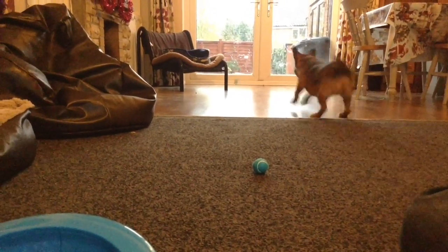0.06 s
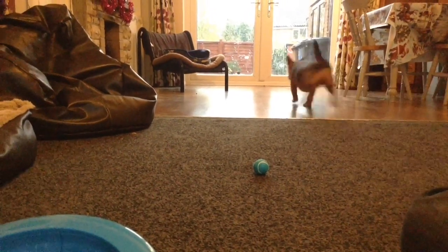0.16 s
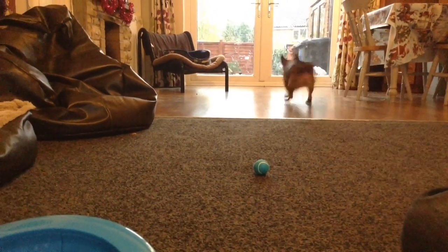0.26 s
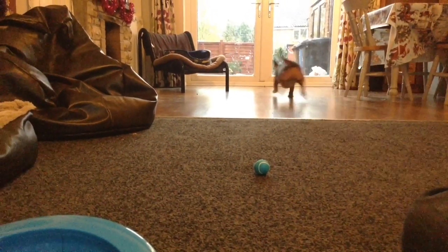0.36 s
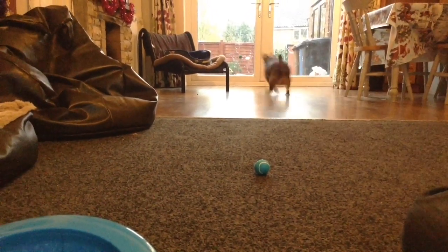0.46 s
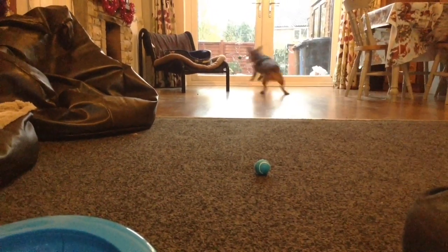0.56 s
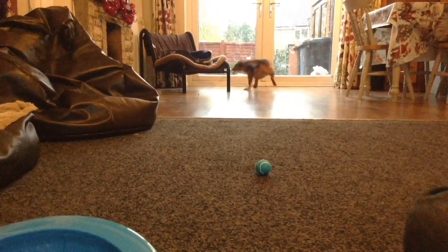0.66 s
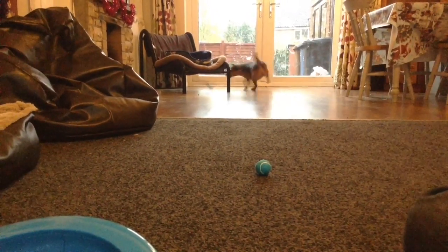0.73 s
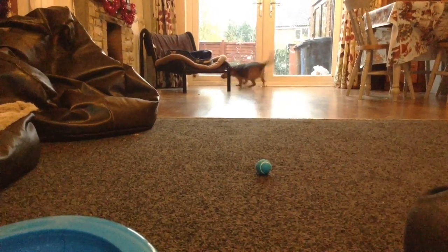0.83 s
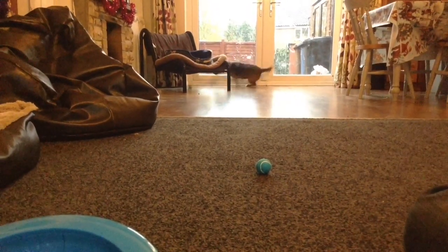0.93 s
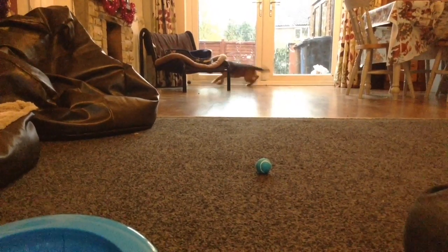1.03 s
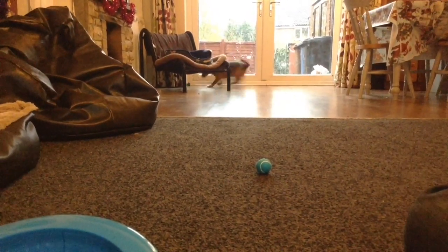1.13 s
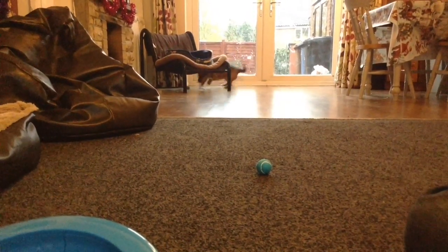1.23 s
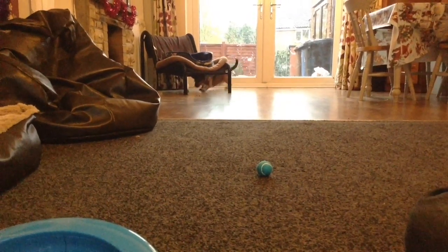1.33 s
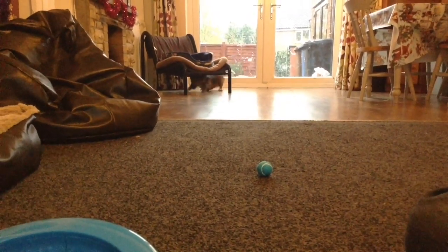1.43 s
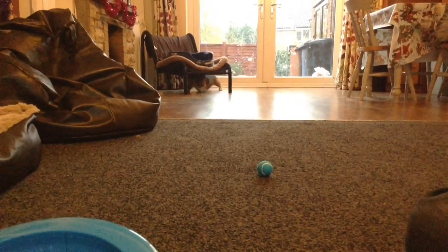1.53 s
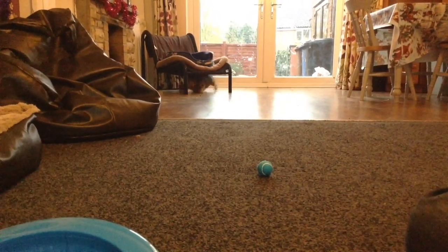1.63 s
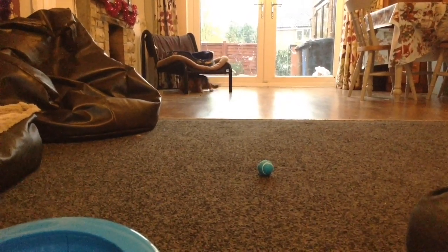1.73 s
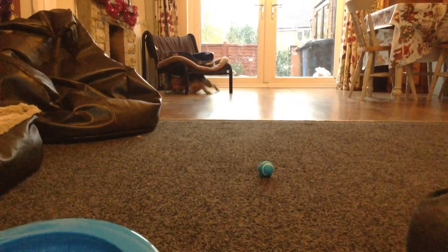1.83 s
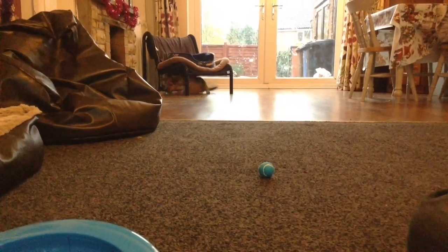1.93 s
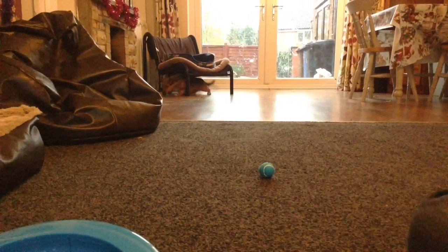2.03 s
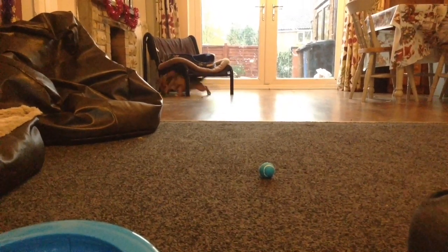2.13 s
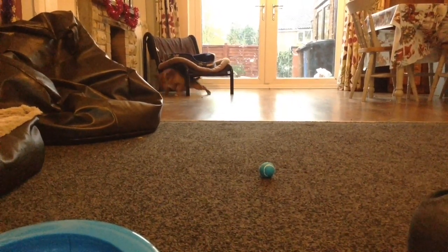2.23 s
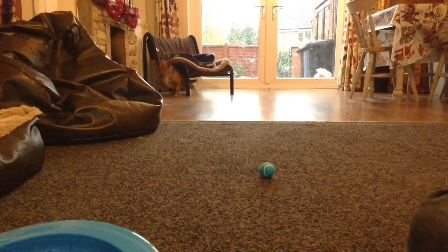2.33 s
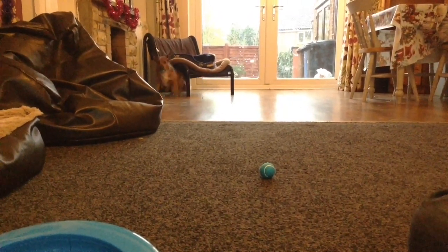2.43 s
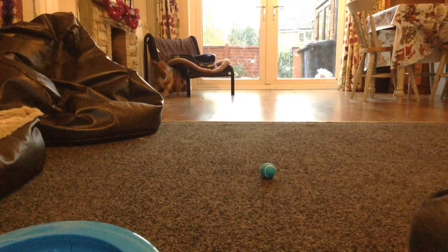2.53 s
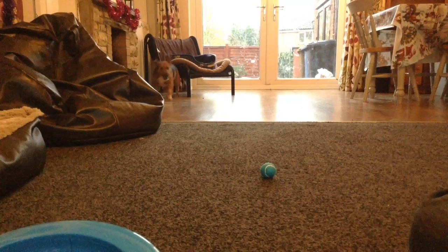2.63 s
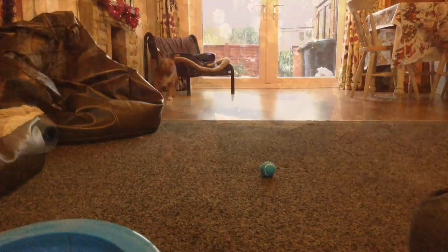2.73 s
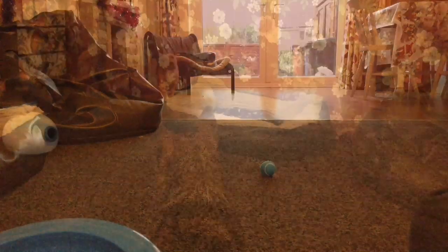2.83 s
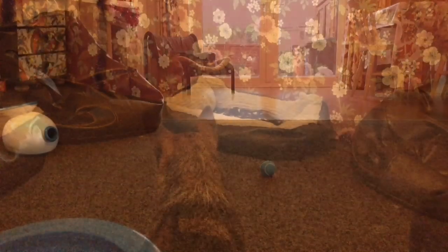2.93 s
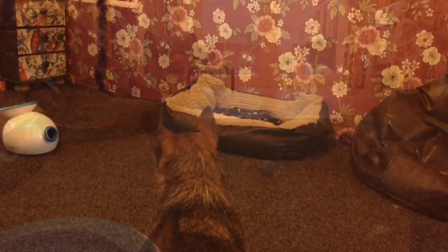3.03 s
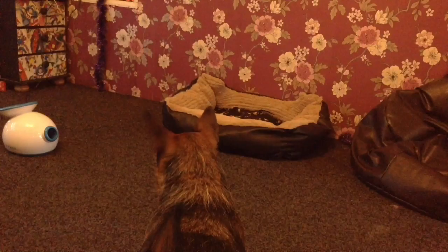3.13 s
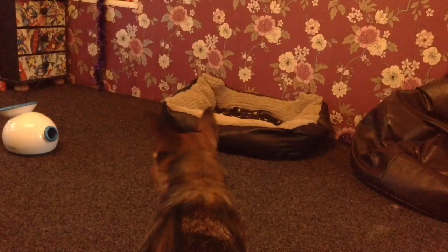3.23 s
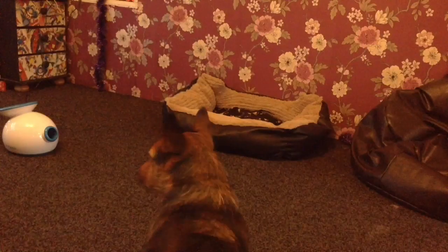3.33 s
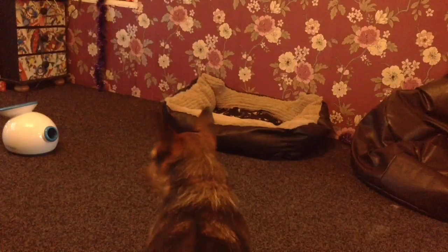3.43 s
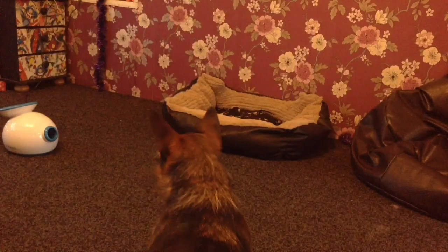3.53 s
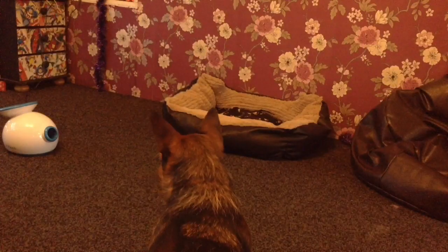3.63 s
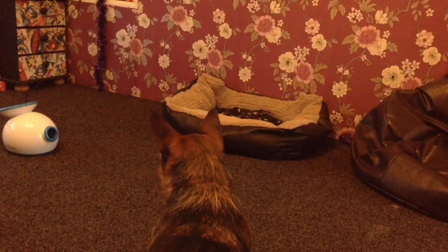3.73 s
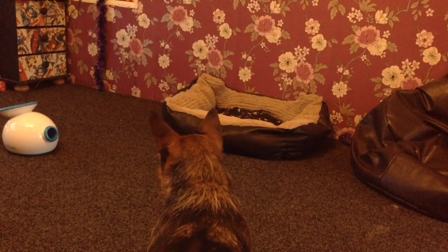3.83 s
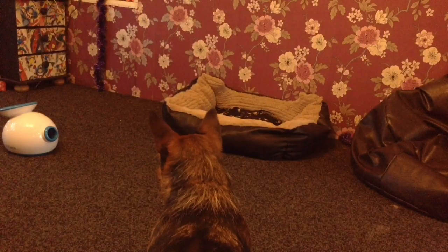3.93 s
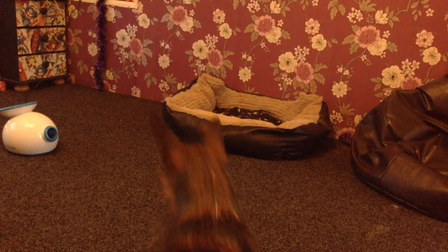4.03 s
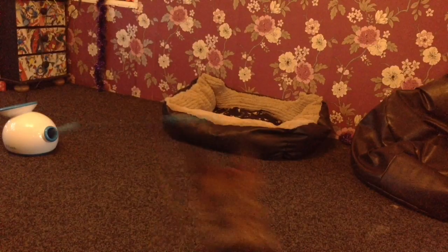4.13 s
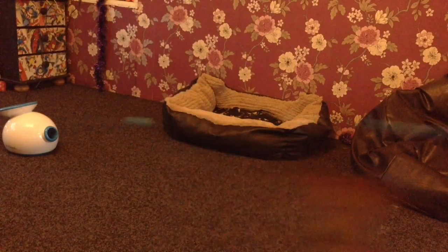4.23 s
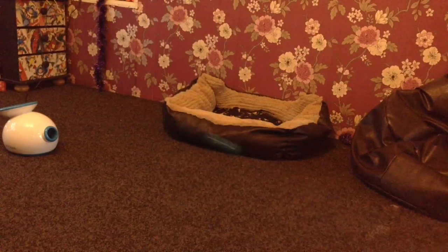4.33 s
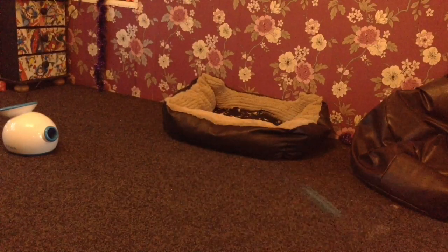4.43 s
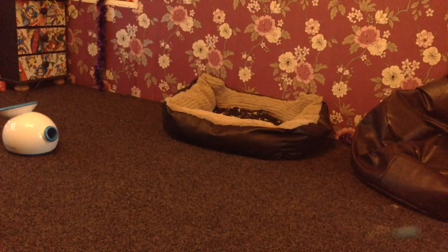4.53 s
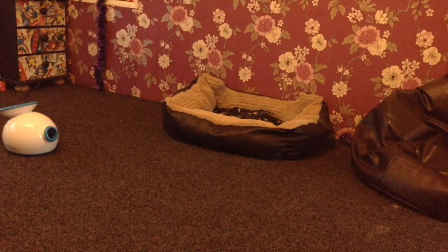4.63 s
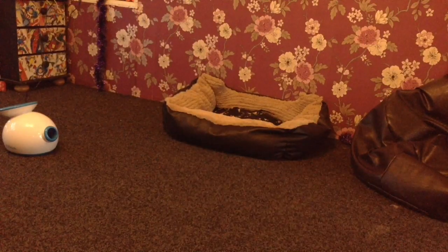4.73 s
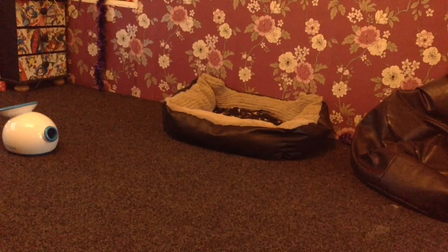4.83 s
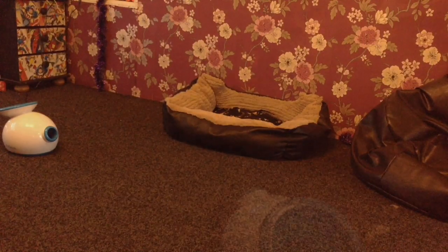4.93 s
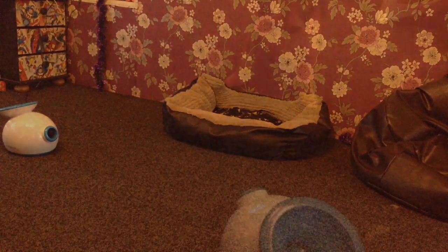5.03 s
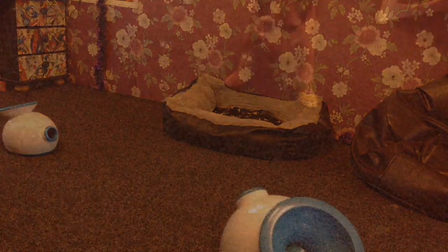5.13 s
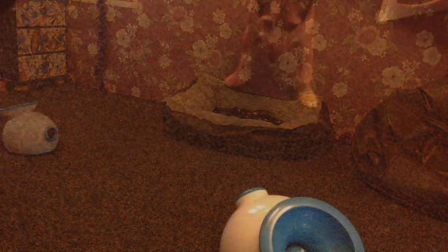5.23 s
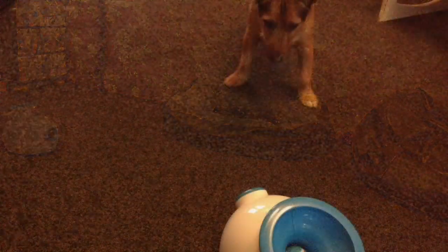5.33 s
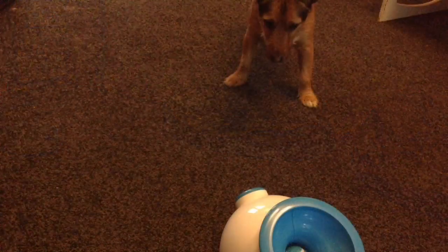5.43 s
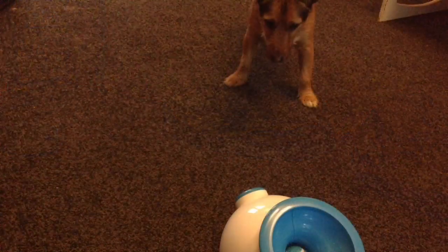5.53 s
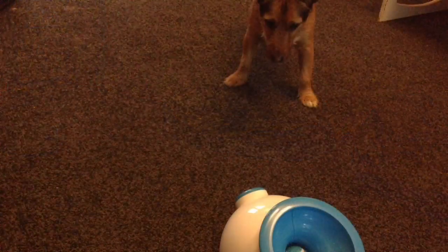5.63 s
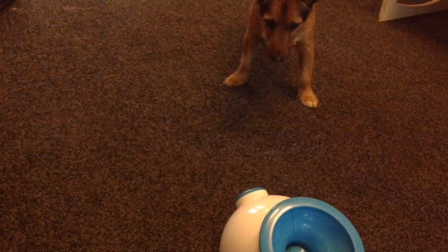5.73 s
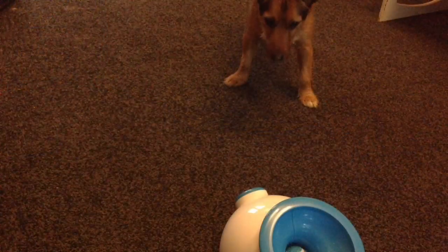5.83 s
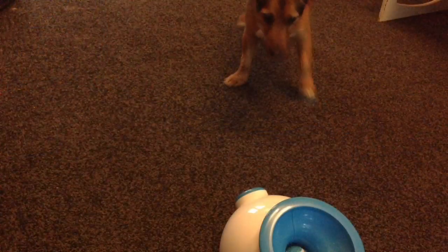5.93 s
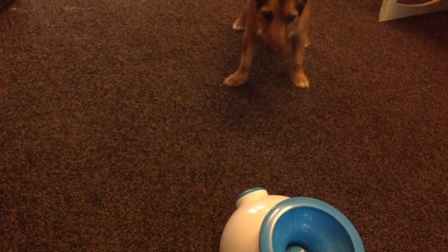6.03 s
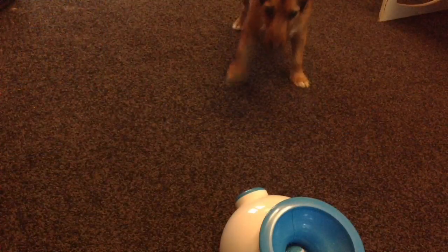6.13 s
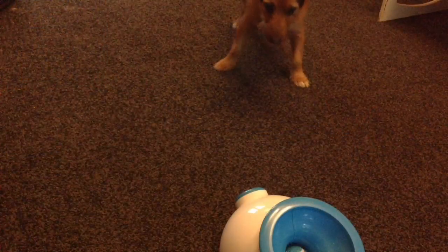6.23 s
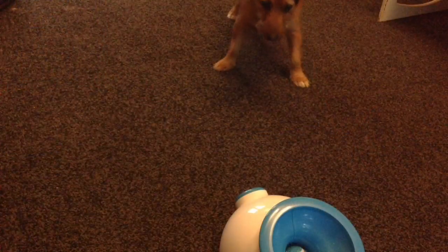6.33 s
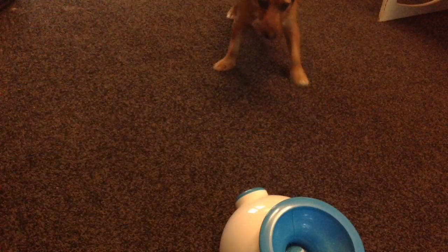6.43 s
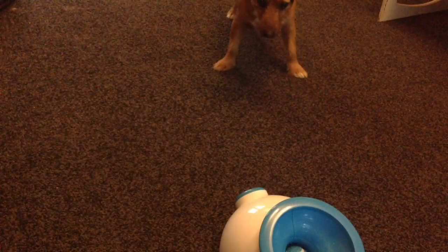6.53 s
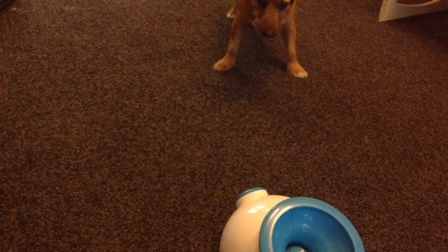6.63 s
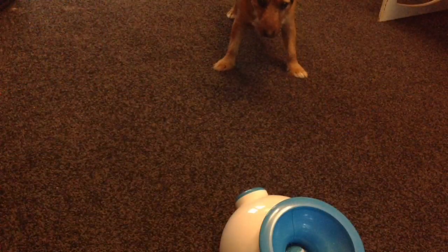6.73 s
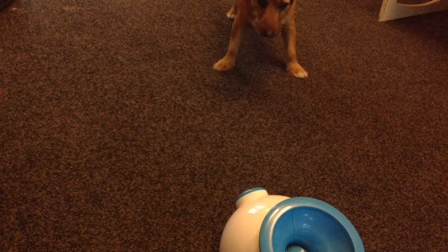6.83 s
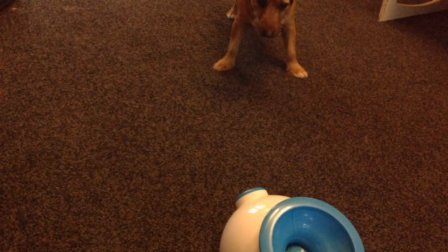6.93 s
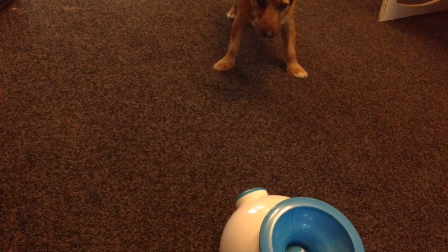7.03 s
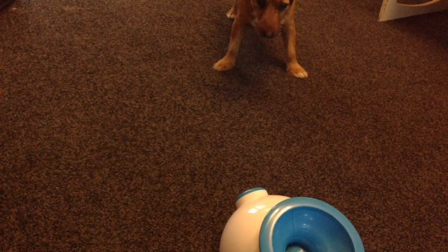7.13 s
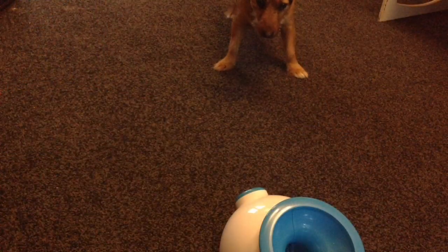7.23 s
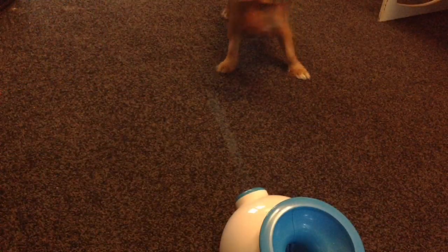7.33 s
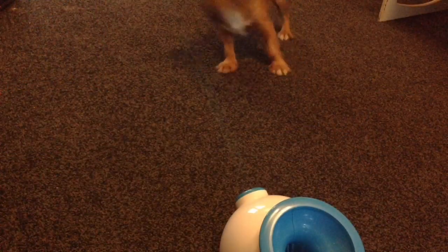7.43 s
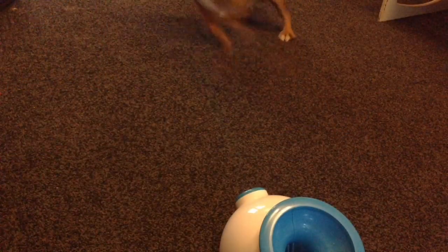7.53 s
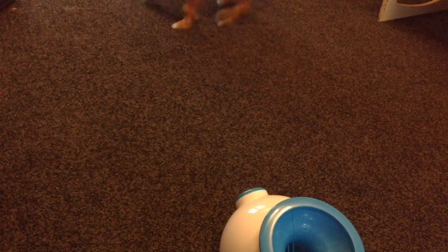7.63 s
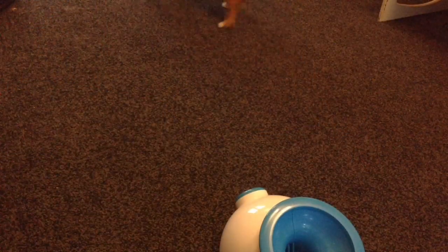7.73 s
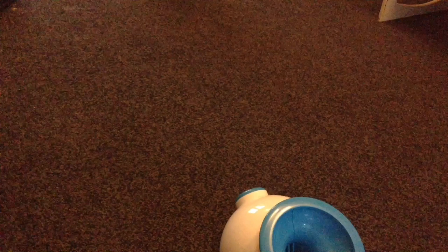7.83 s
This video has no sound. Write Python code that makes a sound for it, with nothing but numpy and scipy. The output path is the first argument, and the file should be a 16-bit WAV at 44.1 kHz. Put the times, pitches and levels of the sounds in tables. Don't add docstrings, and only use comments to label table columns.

```python
import sys
import numpy as np
from scipy import signal
from scipy.fft import rfft, irfft, next_fast_len
from scipy.io import wavfile
from scipy.ndimage import uniform_filter1d

SR = 44100
rng = np.random.default_rng(int(sys.argv[2]) if len(sys.argv) > 2 else 0)


def voltage_ratio(level):
    return 10 ** (np.asarray(level, float) / 20)


def generate_wav(signal):
    frames = np.transpose(np.atleast_2d(signal))
    scaled = np.clip(frames, -1, 1) * 32767
    pcm = np.round(scaled).astype(np.int16)
    wavfile.write(sys.argv[1], SR, pcm)


N = 347067


def rms_one(x):
    return x / np.sqrt(np.mean(x ** 2) + 1e-20)


def peak_level_db(x):
    return 20 * np.log10(np.abs(x).max())


def in_time(rows):
    s, *columns = np.transpose(rows)
    return [np.interp(np.arange(N) / SR, s, c) for c in columns]


def at_hz(points, hz):
    points = np.array(points)
    return np.interp(np.log(hz), np.log(points[:, 0]), points[:, 1])


def colour(x, points, tilt_db=0, pivot_hz=4000):
    size = next_fast_len(len(x) + 4096)
    hz = np.maximum(np.fft.rfftfreq(size, 1 / SR), 20)
    level_db = at_hz(points, hz) + tilt_db * np.log2(hz / pivot_hz)
    cepstrum = irfft(np.log(voltage_ratio(level_db)), size)
    cepstrum[1:(size + 1) // 2] *= 2
    cepstrum[size // 2 + 1:] = 0
    return irfft(rfft(x, size) * np.exp(rfft(cepstrum)), size)[:len(x)]


def rippled(x, ripple):
    size = next_fast_len(len(x))
    hz = np.fft.rfftfreq(size, 1 / SR)
    ripple_db = sum(depth_db * np.exp(-((hz - at) / width) ** 2) for at, width, depth_db in ripple)
    return irfft(rfft(x, size) * voltage_ratio(ripple_db), size)[:len(x)]


def ring(x, hz, t60):
    r, w = voltage_ratio(-60 / (t60 * SR)), 2 * np.pi * hz / SR
    return signal.lfilter([0, np.sin(w)], [1, -2 * r * np.cos(w), r * r], x + 1e-18)


def envelope(rise, t60, start, size=22050):
    t = np.arange(size) / SR
    rise, t60 = max(rise, .0005), max(t60, .005)
    return np.where(t < rise, start + (1 - start) * t / rise, voltage_ratio(-60 * (t - rise) / t60))


def add(bus, s, sound, peak_db):
    i = max(round(s * SR), 0)
    bus[i:i + len(sound)] += (voltage_ratio(peak_db) * sound / np.abs(sound).max())[:N - i]


def grains(size, spread_db):
    return rng.standard_normal(size) * voltage_ratio(spread_db * np.minimum(rng.exponential(1, size), 4))


def wander(rate_hz, points, swing_db):
    return voltage_ratio(np.interp(np.arange(N) / SR * rate_hz, np.arange(points), rng.normal(0, swing_db, points)))


# start_s, end_s
BLENDS = [
    (2.7, 3.31),
    (4.9, 5.52),
]


def listening_place():
    return in_time([(s, k + j) for k, blend in enumerate(BLENDS) for j, s in enumerate(blend)])[0]


def drag_strokes(size, step, swing_db):
    clumps = np.interp(np.arange(size) / step, np.arange(150), voltage_ratio(rng.normal(0, swing_db, 150)))
    return grains(size, spread_db=3.0) * clumps


# start_s, peak_db,
# fade_t60_s, tilt_db_per_octave
BOARD_SCUFFS = [(0.0, -8, 0.29, 2.5), (0.11, -8.5, 0.47, 4), (0.1865, -14, 0.53, 4),
                (0.3558, -14, 0.36, -8), (0.414, -10, 1, 1.5), (0.5292, -8, 0.42, 2.5),
                (0.56, -14, 0.83, -2.5), (0.7284, -11, 0.2, 5), (0.7543, -12, 1, 1),
                (0.8674, -9.5, 0.26, 7), (0.8869, -8.5, 1, -2.5), (0.92, -12, 0.69, 9),
                (1.1007, -26, 0.58, 9), (1.247, -17, 0.85, -0.5), (1.316, -22.5, 0.25, 4),
                (1.3875, -21.5, 0.33, -6), (1.4651, -7, 0.62, -0.5), (1.706, -6.5, 0.42, 2),
                (1.8406, -7.5, 0.91, 0), (2.0573, -13, 0.43, 2), (2.256, -19, 0.32, -1),
                (2.285, -22.5, 0.72, -1.5), (2.4838, -18.5, 0.43, -13), (2.691, -30.5, 0.38, 2),
                (2.885, -38, 0.1, 3)]
CARPET_SCUFFS = [(4.0876, -22, 0.23, 3), (4.41, -30, 1, 6.5), (4.503, -11, 0.3, -7.5),
                 (4.6346, -14, 0.38, 3.5), (4.682, -12, 0.35, 3), (4.803, -14, 0.37, 5.5),
                 (4.9055, -14.5, 0.16, 1), (4.925, -19, 0.55, 4.5), (5.0553, -14.5, 0.64, 4),
                 (4.984, -21.5, .3, -7), (5.108, -13.5, 0.61, 0.5), (5.125, -14.5, 0.44, 2.5),
                 (5.24, -19, 0.96, 2), (6.4495, -68, 0.25, 9)]
# pitch_hz, level_db_per_hz
SCUFF_COLOUR = [(710, -63), (1200, -6), (1520, -6.5), (1830, -0.5), (2250, -5), (2590, -1), (3700, 6),
                (11700, -5), (15300, -9.5), (16000, -67)]


def scuffs(near, far):
    floors = ((BOARD_SCUFFS, .02, .4, -17), (CARPET_SCUFFS, .0069, .9, -14))
    for rows, swell_s, bite, room_db in floors:
        for s, peak_db, t60, tilt_db in rows:
            shape = envelope(swell_s, t60, start=bite)
            drag = shape * drag_strokes(len(shape), 150, 1.5)
            patches = 0
            for step, hz in zip((500, 700, 900), 3600 * 2 ** rng.uniform(0, 1, 3)):
                claw = shape * drag_strokes(len(shape), step, 6)
                patches = patches + ring(claw, hz, 16 / hz)
            sound = rms_one(drag) + voltage_ratio(-10.5) * rms_one(patches)
            sound = colour(sound, SCUFF_COLOUR, tilt_db)
            add(near, s, sound, peak_db - 3.0)
            add(far, s, sound, peak_db + room_db)


# start_s, peak_db
TICKS = [(0.1093, -10), (0.4143, -7), (0.4744, -12), (0.556, -7.5), (0.7287, -16), (0.7547, -2),
         (0.8694, -20), (0.901, -3), (1.1008, -11), (1.2462, -13.5), (1.3163, -14), (1.3394, -14),
         (1.4679, 1.5), (1.4894, -59.5), (1.8423, -11), (2.0596, -15), (3.379, -30), (4.141, -18),
         (4.6353, -8), (4.684, -8), (4.7865, -3.5), (4.8055, -9), (4.9045, -17), (5.0564, -23),
         (5.238, -20), (7.1817, -2), (7.7026, -20), (7.798, 0.5), (7.7695, 6), (4.09, -19), (7.3105, -19),
         (7.3595, -24.5), (7.4915, -28), (4.341, -28), (4.371, -27), (4.9245, -24)]
# pitch_hz, level_db_per_hz
SNAP_COLOUR = [(1500, -19.5), (3500, -5.5), (5500, 0.5), (8300, -9), (11500, -1.5), (16000, -6.5)]


def ticks(near, far):
    for s, peak_db in TICKS:
        snap = rng.standard_normal(1024) * envelope(0, .006, start=1, size=1024)
        snap = colour(snap, SNAP_COLOUR)
        add(near, s, snap, peak_db - 4.5)
        add(far, s, snap, peak_db - 16)


# start_s, peak_db, boom_hz, t60_s
THUDS = [(0.079, -15, 315, 0.13), (0.117, -13.5, 217, 0.11), (0.333, -17, 256, 0.66), (0.38, -9, 227, 0.16),
         (0.407, -19.5, 235, 0.13), (0.434, -10, 235, 0.34), (0.528, -13, 349, 0.42),
         (0.748, -16, 290, 0.32), (0.787, -9.5, 260, 0.19), (1.016, -12, 245, 0.19),
         (1.264, -19.5, 267, 0.93), (1.47, -9, 190, 0.2), (1.478, -6.5, 292, 0.25), (1.527, -13, 197, 0.14),
         (1.706, -17, 286, 0.48), (1.777, -17.5, 266, 0.057), (1.847, -21, 300, 0.11),
         (1.979, -7, 300, 0.1), (1.989, -5, 298, 0.18), (2.488, -17.5, 294, 0.1), (2.523, -21, 250, 0.36),
         (4.093, -19, 230, 0.11), (4.147, -22, 240, 0.16), (4.19, -24, 250, 0.052),
         (4.222, -24.5, 237, 0.086), (4.639, -10.5, 322, 0.054), (4.699, -19.5, 283, 0.07),
         (4.782, -27.5, 255, 0.11), (4.987, -19, 313, 0.62), (5.124, -22.5, 336, 0.2),
         (5.23, -14, 320, 0.066), (7.186, -17, 382, 0.14), (7.364, -11, 282, 0.018), (7.695, -24, 374, 0.1),
         (3.945, -23, 372, 0.1)]


def thuds(near, far):
    press_s, puff_tilt_db, size = .011, -11.5, 13230
    ratios = [.7, .85, 1.0, 1.2, 1.5, 1.9]
    usual_db = np.array([7.9, 19.0, 39.7, 16.3, 6.8, 3.1])
    for s, peak_db, hz, t60 in THUDS:
        push = envelope(press_s, max(t60, .02), start=0.8, size=size) * rng.standard_normal(size)
        push[:2] += 12
        strength = voltage_ratio(usual_db + rng.normal(0, 10.0, 6))
        boom = sum(g * ring(push, hz * k, .055) for k, g in zip(ratios, strength))
        puff = colour(push, [(100, -20.0), (300, -34.0), (16000, -4)], puff_tilt_db, pivot_hz=300)
        sound = rms_one(boom) + voltage_ratio(4.5) * rms_one(puff)
        add(near, s - .002, sound, peak_db)
        add(far, s - .002, sound, peak_db - 4.5)


# pitch_hz, level_db_per_hz
SHELL_COLOUR = [(59, 16), (100, -86), (343, 2), (608, -24.5), (854, 2), (1910, 1), (2320, -1.5),
                (4870, -10), (9210, -15.5), (14700, -22), (16000, -28)]
# pitch_hz, level_db, t60 in steps of 0.025 s
SHELL = [(372, 4, 1.4), (870, 19, 4.4), (2380, 12.5, 2.1), (1350, 5, 2.7), (4800, 3, .8)]


def struck_shell(shake, grip, crack_t60, body_hz, tilt_db, beside):
    size = len(shake) - grip
    crack = rng.standard_normal(size) * voltage_ratio(-60 * np.arange(size) / SR / crack_t60)
    blow = shake.copy()
    blow[grip:] += crack * 7 / np.sqrt(np.sum(crack ** 2))
    modes = 0
    for hz, mode_db, t60 in SHELL:
        strength = voltage_ratio(mode_db + rng.normal(0, 4))
        modes = modes + strength * ring(blow, hz * rng.uniform(.985, 1.015), .025 * t60)
    body = ring(blow, body_hz, .012)
    modes_db, body_db = (-19.5, -10.5) if beside else (-9.5, -3.5)
    ringing = voltage_ratio(modes_db) * rms_one(modes) + voltage_ratio(body_db) * rms_one(body)
    small = signal.butter(2, 300, "high", fs=SR, output="sos")
    return rms_one(colour(blow, SHELL_COLOUR, tilt_db, pivot_hz=2000)) + signal.sosfilt(small, ringing)


# start_s, peak_db, body_hz, rattle_t60_s, room_db
CRACKS = [
    (3.912, -7.5, 4840, 0.088, 0.5),
    (3.921, -8, 870, 0.28, -10.5),
    (7.178, 1, 1680, 0.071, -3),
    (7.358, -10.5, 2620, 0.073, -3),
    (7.769, -2, 1530, 0.1, -6.5),
]
# start_s, peak_db, body_hz, tilt_db_per_octave
KNOCKS = [(0.72, -32, 1360, -6), (1.125, -21, 980, -12), (2.256, -35, 1270, -15), (1.779, -20.5, 860, -7),
          (1.99, -18.5, 1100, -24), (3.03, -34, 980, -9), (3.379, -28.5, 460, 6.5),
          (4.089, -20.5, 1400, -2.5), (4.15, -25, 4540, 6), (4.0912, -21, 4610, -2), (4.172, -21, 1070, -2),
          (4.195, -24, 910, -9), (4.215, -24.5, 1050, -2.5), (4.233, -33, 1090, -1), (4.384, -30, 513, -10),
          (4.294, -30, 805, -10), (4.502, -12, 2510, 11.5), (4.503, -15, 4830, 5), (4.513, -16, 2400, -0.5),
          (4.527, -14.5, 2510, 0), (4.548, -20, 1760, -5), (4.787, -19.5, 3470, 10),
          (7.31, -13.5, 1470, -2), (7.365, -11, 1070, -3.5), (7.392, -36, 1010, 6),
          (7.403, -15, 1090, -1.5), (7.491, -15.5, 1510, -1.5), (7.554, -24, 1140, -15),
          (7.414, -20.5, 1100, -4), (7.512, -17, 860, -3.5), (7.525, -20, 990, -3.5),
          (7.563, -19, 1450, -3.5), (7.62, -28, 2500, -1.5), (7.644, -18.5, 970, -2.5),
          (7.652, -21.5, 700, -5), (7.723, -34, 1020, -9), (7.758, -20, 3560, 2), (7.761, -13.5, 1630, -11),
          (7.798, -7.5, 1760, 2), (7.818, -9, 2580, -0.5), (7.825, -18, 2000, 1)]


def knocks(near, far):
    blows = [(s, db, hz, t60, 2.5, room_db, .005) for s, db, hz, t60, room_db in CRACKS]
    for s, peak_db, hz, tilt_db in KNOCKS:
        t60, room_db = (.097, -6) if s > BLENDS[1][0] else (.21, -2.5)
        blows.append((s, peak_db, hz, t60, tilt_db, room_db, .0005))
    for s, peak_db, body_hz, t60, tilt_db, room_db, grip_s in blows:
        grip, beside = round(grip_s * SR), s > BLENDS[1][0]
        shake = grains(size=8820, spread_db=3.5) * 0.24
        shake = shake * envelope(grip / SR, t60, start=0.17, size=8820)
        direct = struck_shell(shake, grip, .015, body_hz, tilt_db, beside)
        roomward = struck_shell(shake, grip, .0005, body_hz, tilt_db, beside)
        add(near, s - grip / SR, direct, peak_db)
        room_peak_db = peak_db + room_db + peak_level_db(roomward) - peak_level_db(direct)
        add(far, s - grip / SR, roomward, room_peak_db)


# start_s, peak_db, hollow_hz, t60_s
RATTLE = [(0.712, -26, 1360, 0.23), (0.735, -28, 1280, 0.27), (1.121, -28.5, 1010, 0.12),
          (1.782, -31.5, 970, 0.94), (3.935, -20, 2350, 0.35), (4.101, -27, 1280, 0.54),
          (4.202, -28.5, 1240, 0.25), (4.388, -40, 485, 0.12), (4.449, -34, 585, 0.97),
          (7.192, -28, 2700, 0.31), (7.31, -40, 1250, 0.094), (7.365, -31.5, 1140, 1),
          (7.528, -43, 950, 0.13), (7.704, -33, 850, 0.29), (7.763, -20.5, 1580, 0.037)]


def rattle(near, far):
    s, peak_db, hollow_hz, t60 = np.transpose(RATTLE)[:, :, None]
    since, rise_db_per_s = np.arange(N) / SR - s, 800
    shapes_db = peak_db + np.where(since < 0, rise_db_per_s * since, -60 * since / t60)
    level_db = np.maximum(shapes_db.max(axis=0), -120)
    centre_hz = hollow_hz[shapes_db.argmax(axis=0), 0]
    touches = (rng.random(N) < 2000 / SR) * grains(N, spread_db=2.5)
    felt = signal.butter(2, 2500, fs=SR, output="sos")
    touches = signal.sosfilt(felt, touches)
    dealt = np.repeat(rng.integers(0, 4, N // 32 + 1), 32)[:N]
    sound = 0
    for k, hz in enumerate(np.geomspace(380, 3200, 16)):
        nearness_db = -14.0 * np.log2(hz / centre_hz) ** 2
        sound = sound + ring(touches * (dealt == k % 4) * voltage_ratio(nearness_db), hz, 16 / hz)
    sound = voltage_ratio(level_db - 3) * rms_one(np.diff(sound, prepend=0) * 1000 / centre_hz)
    add(near, 0, sound, peak_level_db(sound))
    add(far, 0, sound, peak_level_db(sound) - 4)


# start_s, peak_db, t60_s, tilt_db_per_octave
CLICKS = [(0.1087, -18, .004, 3), (0.1865, -23, .004, -1), (0.4219, -18, .004, 3), (0.889, -14, .004, 13),
          (3.362, -34, .004, 2), (3.3787, -10.5, 0.0024, 6.5), (3.3855, -19, .002, 2),
          (3.391, -30, .002, 3), (3.914, -1.5, 0.0051, 0), (4.0908, -20, 0.0065, -9),
          (4.9045, -32, .004, -9), (7.1735, -8, .006, 6), (7.1798, -3.5, 0.011, -4),
          (7.1833, -12, .008, -4.5), (7.199, -26, .006, 6), (7.355, -22, .008, 6), (7.365, -16, .005, 0),
          (7.373, -18, .005, 1), (7.405, -22, .005, 4), (7.703, -28, .01, 3), (4.684, -13, .004, -2),
          (1.7043, -12, .006, -6), (1.522, -18, .006, 6), (1.118, -36, .006, 8), (2.882, -38, .01, -4),
          (4.5038, -11, .004, -3), (5.119, -18, .005, 1)]


def clicks(near, far):
    for s, peak_db, t60, tilt_db in CLICKS:
        shape = envelope(0, 1, start=0.88, size=1024) ** (1 / max(t60, .001))
        snap = colour(rng.standard_normal(1024) * shape, SNAP_COLOUR, tilt_db)
        add(near, s, snap, peak_db)
        add(far, s, snap, peak_db - 5)


# start_s, turns_per_s, aim_turns_per_s
WHEEL = [
    (0, 44, 47),
    (2.6, 45.1, 70),
    (3.91, 45, 28),
    (4.95, 27.9, 70),
    (7.18, 48, 39),
    (7.4, 39.5, 66),
]


def wheel_speed():
    spin_up_s, sag_s = 1.64, .1
    t, turns = np.arange(N) / SR, np.zeros(N)
    for s, start, aim in WHEEL:
        lag = spin_up_s if aim > start else sag_s
        turns = np.where(t >= s, aim + (start - aim) * np.exp(-np.maximum(t - s, 0) / lag), turns)
    return turns


SLOW_WHEEL = .946


def wheel_angle(turns):
    flutter = np.interp(np.arange(N) / SR * 9, np.arange(80), rng.normal(0, .002, 80))
    return np.cumsum(turns * (1 + flutter)) / SR


# shaft_multiple, faster_wheel_db, slower_wheel_db
ORDERS = [(2, -0.5, -12), (3, -0.5, 4), (4, -14, 5.5), (5, -7.5, 3), (6, 1, -5), (7, -3, -11),
          (8, -7, -0.5), (9, 4, 6), (10, 4, -1), (11, -0.5, -7), (12, 6, -2), (13, 2, -4), (14, -3, 0.5),
          (15, -11, -14), (16, 2, 12), (17, 5.5, -20), (18, 7, 2)]


def wheel_hum(angle, wheel, speed):
    order, fall_db = np.arange(128), .85
    level_db = rng.normal(0, 3, 128) - fall_db * order
    for k, *strength_db in ORDERS:
        level_db[int(k)] = strength_db[wheel] - fall_db * k
    partials = voltage_ratio(level_db) * np.exp(2j * np.pi * rng.random(128)) * (order > 1)
    one_turn = irfft(partials, 1024) * 1024 / 24 * speed ** 8
    return wander(7, 60, 4) * np.interp(angle % 1 * 1024, np.arange(1024), one_turn, period=1024)


# pitch_hz, level_db_per_hz
PLACES = [
    [(40, -38), (85, -26.5), (140, -14), (256, 9.5), (305, 2.5), (392, -2.5), (600, -19), (990, 2.5),
     (1410, -10.5), (2000, -3), (2210, -22.5), (3740, -17), (8300, -25), (16000, -26)],
    [(40, -43), (100, -22), (160, -20), (220, 4.5), (392, 0.5), (640, 0.5), (930, 3.5), (1440, 3),
     (2200, -2.5), (4680, -12), (5580, -7), (6330, -9.5), (16000, -18)],
    [(40, -73), (133, -29), (283, 3), (444, -4), (663, -12.5), (1020, 4), (1340, -3), (1950, -2.5),
     (2400, -11.5), (4340, -18), (5580, -12), (6820, -22.5), (11100, -23.5), (16000, -19.5)],
]
# pitch_hz, width_hz, level_db
RIPPLE = [
    [(13200, 300, -3)],
    [(7000, 900, -5), (8900, 300, -4), (11100, 200, 3), (13300, 300, -4)],
    [(6750, 160, -16), (8800, 150, -7), (9600, 400, -3), (11100, 200, 4), (13350, 200, -10),
     (14500, 300, 2)],
]
THROB_DB = [-16, 7, 8]
PULSE_DB = [2, 0.5, 1.5]


def whirr(hum, slow_angle, place):
    idle_angle = 28.7 * (np.arange(N) / SR - .001)
    bass, sound = signal.butter(2, 500, fs=SR, output="sos"), 0
    for k, (points, throb_db, pulse_db) in enumerate(zip(PLACES, THROB_DB, PULSE_DB)):
        weight = np.sqrt(np.clip(1 - np.abs(place - k), 0, 1))
        turn = 2 * np.pi * (slow_angle if k else idle_angle)
        pulse = voltage_ratio(pulse_db * (np.cos(turn) + .5 * np.cos(2 * turn - 1)))
        air = rng.standard_normal(N)
        low = signal.sosfilt(bass, air)
        air = low + (air - low) * rms_one(pulse)
        heard = rippled(colour(air + voltage_ratio(throb_db) * hum, points), RIPPLE[k])
        sound = sound + weight * rms_one(heard)
    return sound


# start_s, end_s, level_db, rise_s
WHINE = [
    (2.7, 3.925, -52.5, 0.45),
    (4.198, 4.52, -51, 0.13),
    (5.285, 7.184, -46, 0.094),
    (7.216, 7.322, -48, 0.023),
    (7.39, 7.712, -45, 0.11),
]


def whine_gain():
    idle_db, fall_s = -100, .057
    t = np.arange(N) / SR
    gain = voltage_ratio(idle_db) * (t > WHINE[0][0])
    for on, off, level_db, rise in WHINE:
        ramp = np.clip((t - on) / rise, 0, 1) ** 1.6
        gain = gain + voltage_ratio(level_db) * ramp * np.clip(1 + (off - t) / fall_s, 0, 1)
    return gain


# shaft_multiple, level_db
SIDEBANDS = [(1, -25), (2, -32), (3, -10), (4, -25), (6, -20), (9, -22)]
SIDEBAND_SHARE = [
    [.4, .5, 1.2],
    [1.2, 1.6, .4],
]


def whine(angles, place):
    wobble = 1
    for angle, share in zip(angles, SIDEBAND_SHARE):
        sides = sum(1.25 * voltage_ratio(side_db) * np.cos(2 * np.pi * k * angle + k) for k, side_db in SIDEBANDS)
        wobble = wobble + np.interp(place, [0, 1, 2], share) * sides
    phase = 2 * np.pi * 5534.3 * np.arange(N) / SR
    tone = wobble * np.sin(phase)
    tone = tone + voltage_ratio(-18) * np.sin(phase / 2)
    upper = wobble ** 2 * np.sin(phase * 3 / 2)
    tone = tone + voltage_ratio(-18) * np.clip(2 - place, 0, 1) * upper
    tone = tone + voltage_ratio(-32) * wobble * np.sin(phase * 2)
    return np.sqrt(2) * whine_gain() * tone * wander(12, 100, 1.5)


# time_s, level_db
BUSTLE = [(0, -31.5), (0.92, -31.5), (1.22, -36), (1.97, -36), (2.47, -36.5), (2.94, -44), (3.94, -60),
          (4.1, -30), (4.49, -46.5), (4.8, -36), (5.13, -41.5), (5.3, -46.5), (7.1, -53), (7.36, -32),
          (7.69, -39), (7.87, -43)]


def motor():
    turns, place = wheel_speed(), listening_place()
    speeds = (1, SLOW_WHEEL)
    angles = [wheel_angle(turns * speed) for speed in speeds]
    hum = sum(wheel_hum(angle, k, speed) for k, (angle, speed) in enumerate(zip(angles, speeds)))
    wheels_db = np.interp(place, [0, 1, 2], [-60, -46.5, -40.5])
    wheels = voltage_ratio(wheels_db) * (turns / 50) ** 2.4
    level = np.hypot(wheels, voltage_ratio(in_time(BUSTLE)[0]))
    return level * whirr(hum, angles[-1], place) + whine(angles, place)


# start_s, length_s, level_db
RUSTLE = [
    (7.1, 0.29, -46),
    (4.6, 0.12, -46),
]
# pitch_hz, level_db_per_hz
RUSTLE_COLOUR = [(3000, -25), (6000, -1), (9000, -2), (14500, -1), (16000, -12)]


def rustle():
    t, shape = np.arange(N) / SR, 0
    for s, length, level_db in RUSTLE:
        shape = shape + voltage_ratio(level_db) * np.sin(np.pi * np.clip((t - s) / length, 0, 1)) ** 0.58
    return shape * wander(30, 240, 2.5) * rms_one(colour(grains(N, spread_db=4.0), RUSTLE_COLOUR))


# pitch_hz, t60_s
ROOM = [(150, 0.4), (400, 0.48), (1040, 0.7), (2760, 0.49), (7280, 0.27)]


def room(x):
    t, edges, tail = np.arange(SR * 3 // 4) / SR, 70 * 2 ** np.arange(0, 8.1, .5), 0
    for low, high in zip(edges, edges[1:]):
        band_pass = signal.butter(2, [low, high], "band", fs=SR, output="sos")
        band = signal.sosfilt(band_pass, rng.standard_normal(len(t)))
        tail = tail + band * voltage_ratio(-60 * t / at_hz(ROOM, np.sqrt(low * high)))
    answer = rfft(tail * (1 - np.exp(-t / 0.0026)))
    power = uniform_filter1d(np.abs(answer) ** 2, size=60)
    tail = irfft(answer / np.sqrt(power + 1e-9), len(t))
    return signal.fftconvolve(x, tail / np.sqrt(np.sum(tail ** 2)))[:N]


# start_s, peak_db, t60_s
JOLTS = [(0.04, -59, .2), (0.361, -62, .4), (0.74, -64, .2), (0.86, -59, .3), (1.01, -58, .2),
         (1.47, -51, 0.55), (1.83, -58, 0.18), (3.37, -70, .2), (3.91, -74, .2), (4.1, -72, .3),
         (4.5, -70, .2), (4.63, -70, .2), (7.175, -62, .2), (7.36, -66, .2), (7.765, -66, .2)]


def rumble():
    low = signal.butter(2, [25, 90], "band", fs=SR, output="sos")
    shaken = np.zeros(N)
    for s, peak_db, t60 in JOLTS:
        add(shaken, s, envelope(0.018, t60, start=0), peak_db)
    return (voltage_ratio(-101) + shaken) * rms_one(signal.sosfilt(low, rng.standard_normal(N)))


# time_s, level_db
LEAVING = [(0, -1), (5.27, 2), (5.45, -15), (6.2, -20), (6.9, 0.5), (7.87, -0.5)]
# pitch_hz, width_hz, level_db
ACROSS = [(614, 130, -2.5), (3030, 250, -2), (3750, 290, 1.5), (8160, 650, 2), (9750, 540, -1),
          (13100, 300, -3)]
BESIDE = [(557, 89, -2), (7330, 490, -5), (8800, 950, -6), (13400, 300, 0), (3030, 730, 1.5),
          (5900, 550, 1.5)]


def scene():
    near, far = np.zeros(N), np.zeros(N)
    for source in (scuffs, ticks, thuds, knocks, rattle, clicks):
        source(near, far)
    no_bass = signal.butter(8, 150, "high", fs=SR, output="sos")
    contacts = signal.sosfilt(no_bass, near + room(far)) * voltage_ratio(in_time(LEAVING)[0])
    across = np.arange(N) / SR < BLENDS[1][1]
    contacts = np.where(across, rippled(contacts, ACROSS), rippled(contacts, BESIDE))
    return (contacts + motor() + rustle())[None]


def band_limit(x):
    return signal.sosfilt(signal.butter(12, 16480, fs=SR, output="sos"), x)


def record(dry):
    heard = np.clip(dry + rumble(), -.88, .88)
    top_cut = signal.ellip(10, .5, 46, 15330, fs=SR, output="sos")
    return band_limit(signal.sosfilt(top_cut, heard))


dry = scene()
out = record(dry)
generate_wav(out)
```